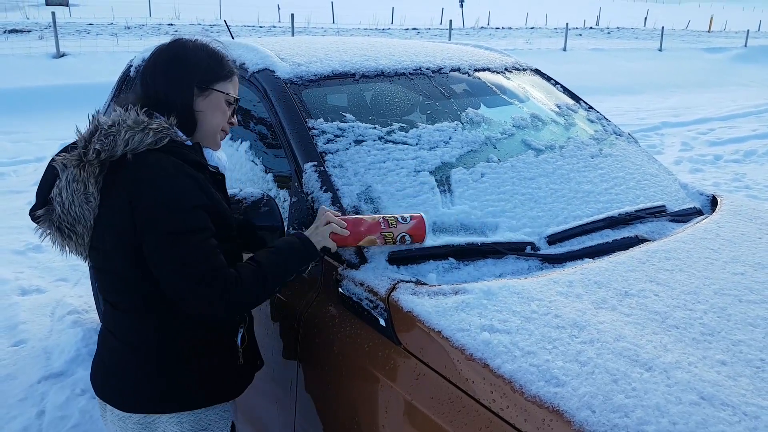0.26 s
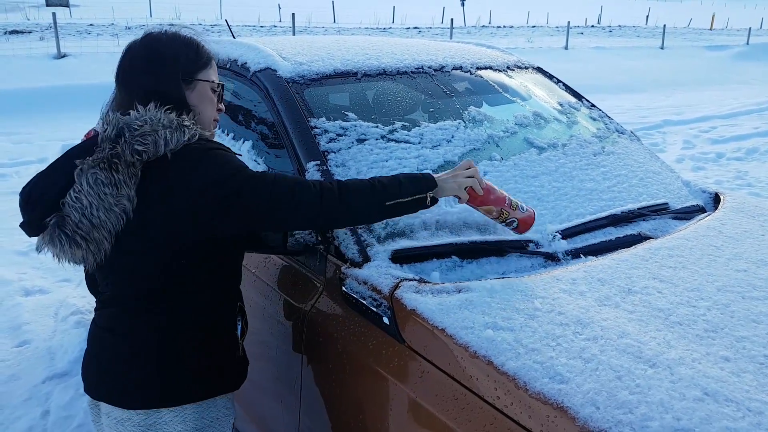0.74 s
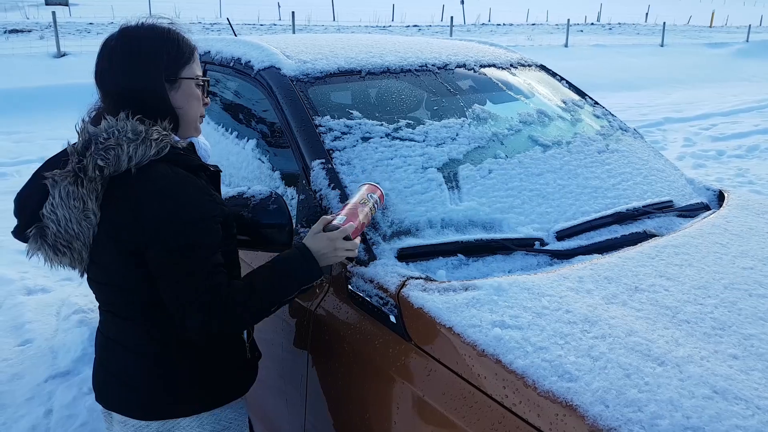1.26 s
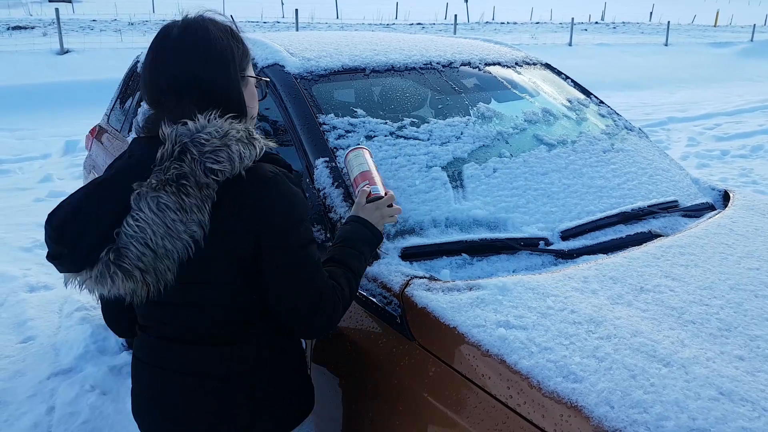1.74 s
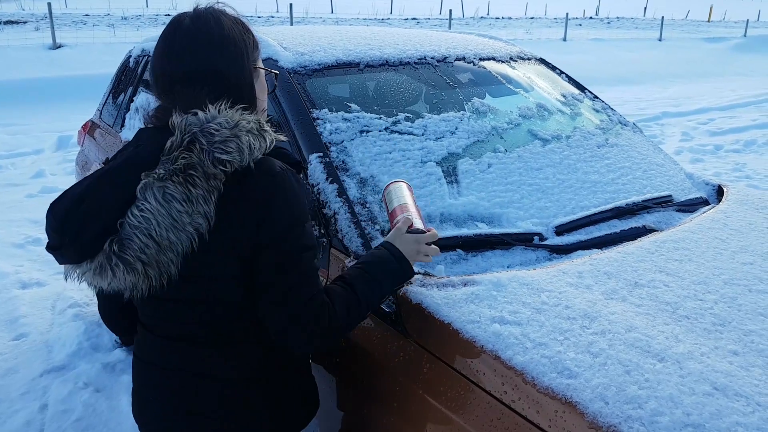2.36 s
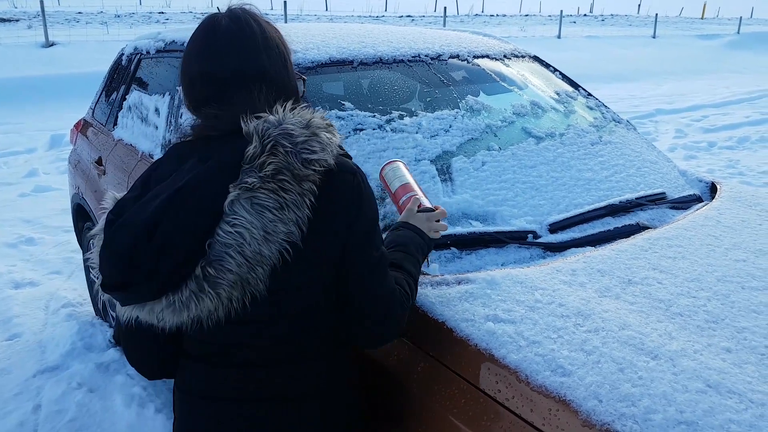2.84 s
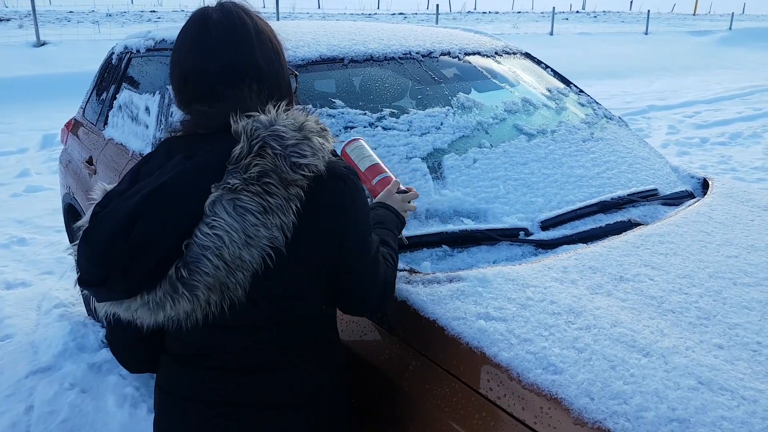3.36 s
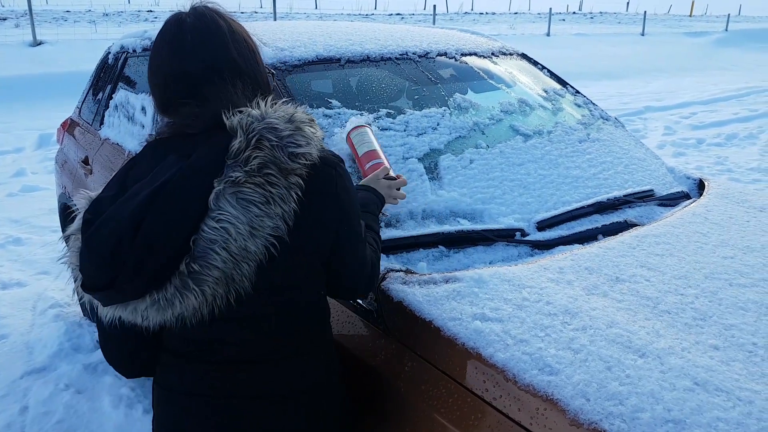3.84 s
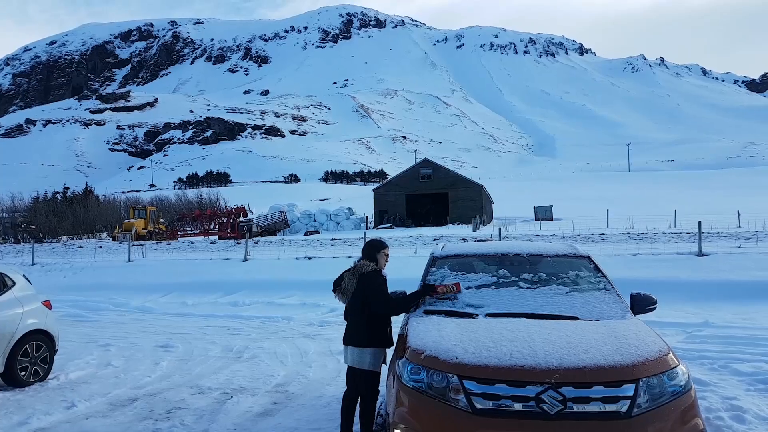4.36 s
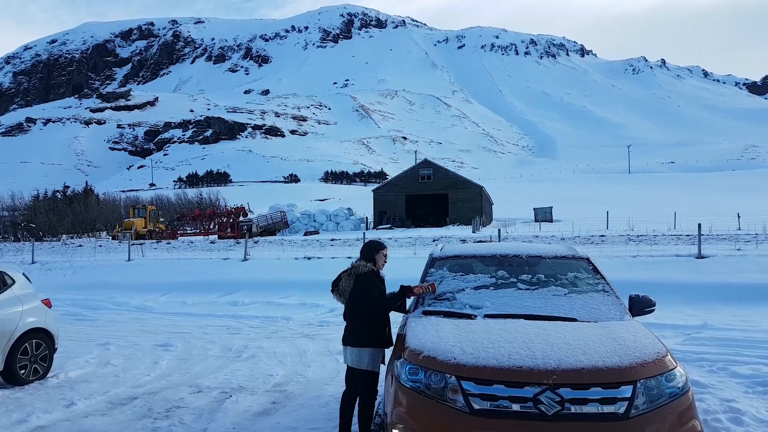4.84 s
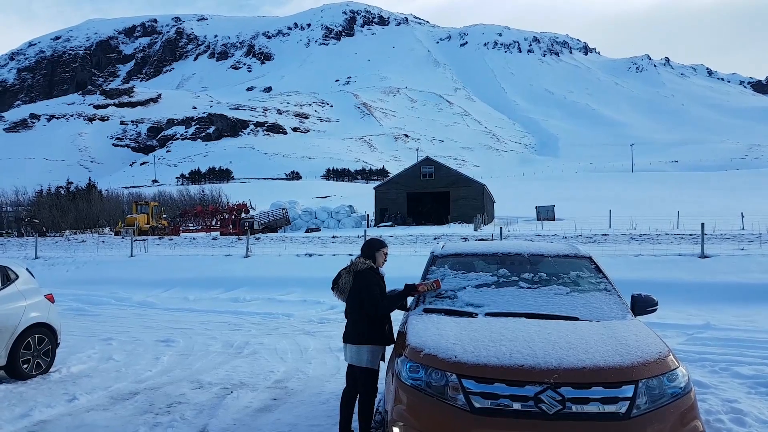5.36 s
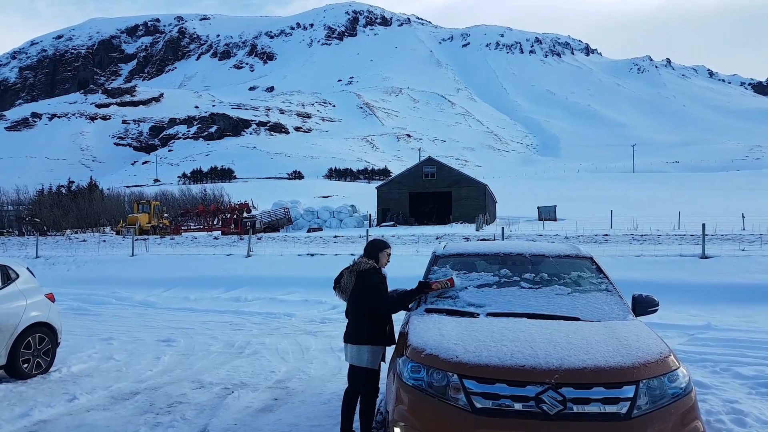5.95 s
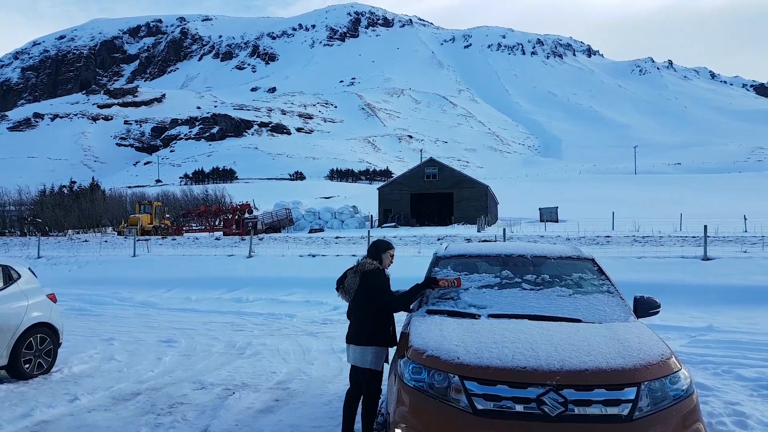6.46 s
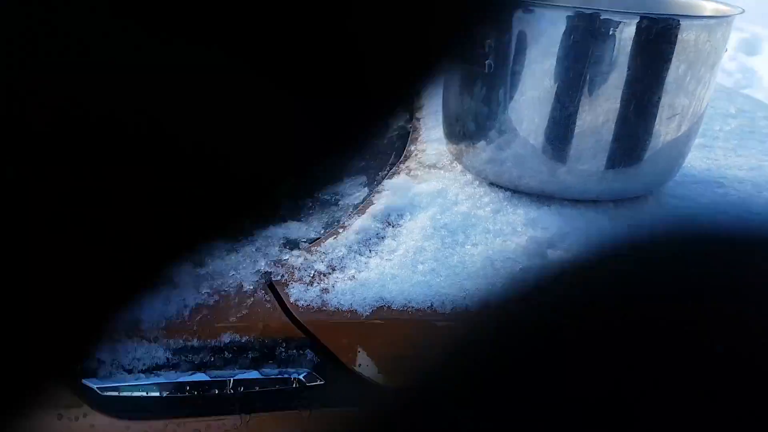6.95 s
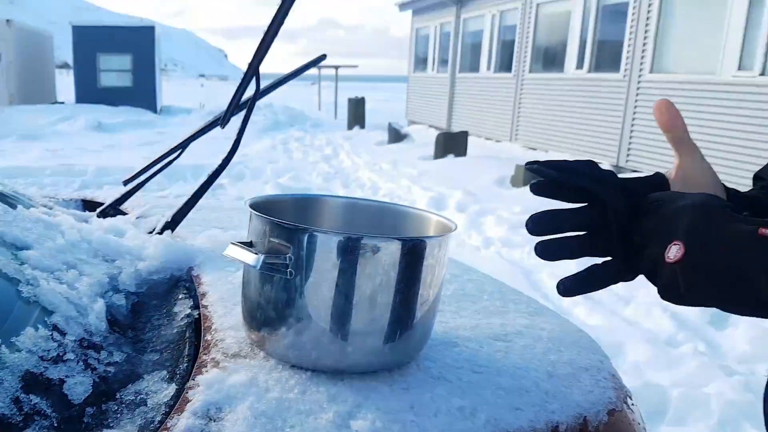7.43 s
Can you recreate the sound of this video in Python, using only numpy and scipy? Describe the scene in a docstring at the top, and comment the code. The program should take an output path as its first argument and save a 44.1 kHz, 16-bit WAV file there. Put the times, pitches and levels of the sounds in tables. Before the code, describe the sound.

Irregular crunchy scrapes of a tube rim on icy glass, dense at first, then in separated bursts, with faint jacket rustle and a soft engine idle. The scraping cuts to a weaker, more distant sound with loose icy crackles. Then it stops, and a much stronger low motor rumble appears at close range, with a brushing glove and blunt handling thumps on the microphone.

```python
"""Outdoors in snow, beside an idling car: a cardboard tube's rim scrapes frost off the windshield.
The rim catches, slips and crushes ice: first laid flat, then on edge, then heard from across the yard.
At last the microphone is beside the hood, where the engine rumbles and a glove brushes and bumps the camera.
Ice is random grains and blows ringing through resonances; the engine is firing tones over coloured noise;
jacket, wind and glove are shaped noise, and each bump is a swing of pressure with a dull knock."""
import sys
import numpy as np
from scipy import signal
from scipy.fft import rfft, irfft, next_fast_len
from scipy.io import wavfile
from scipy.ndimage import uniform_filter1d, map_coordinates

SR = 44100
rng = np.random.default_rng(int(sys.argv[2]) if len(sys.argv) > 2 else 0)


def unload_wav(signal):
    """Save mono or channel-first audio to the path in sys.argv[1] as 16-bit WAV at rate SR, clipped to [-1, 1]."""
    wavfile.write(
        sys.argv[1],
        SR,
        np.round(np.clip(np.atleast_2d(signal).T, -1, 1) * 32767).astype(np.int16),
    )


N = 339429  # length in samples

# Times in seconds: the tube turns on edge; the microphone is across the yard; it is beside the hood.
TURN_S, FAR_S, HOOD_S = 1.0, 4.09, 6.822

# The idle sinks as the engine warms. Each row: time in seconds, firings per second.
IDLE_RATE = [(0, 43.2), (4.08, 42.9), (4.1, 40.8), (5.3, 40.0), (6.81, 40.4), (6.83, 34.5), (7.7, 34.4)]
# Engine tones. Each row: multiple of the firing rate, then level in dB by the door, from afar, by the hood.
ENGINE_TONES = [(1, -53.5, -43, -34), (2, -90, -65, -70), (3, -51.5, -67, -40.5), (4, -52, -55.5, -39.5),
                (5, -49.5, -51.5, -35)]
# Colour of engine and open-air noise at each place. Each row: frequency in Hz, relative density in dB per Hz.
DOOR_NOISE = [(29, -37), (50, -9), (119, 0.5), (600, -7), (1070, -10.5), (1910, -13.5), (6550, -40),
              (16000, -98)]
YARD_NOISE = [(60, -20), (113, -0.5), (142, -8), (172, -17), (207, -4.5), (268, -17), (400, -21),
              (621, -14), (698, -23.5), (1700, -25), (2090, -33), (16000, -62.5)]
HOOD_NOISE = [(41, -52), (70, -2), (170, 0), (214, -2), (314, -21.5), (376, -13), (853, -20.5), (1650, -27),
              (4480, -47), (11600, -68)]
# Stereo width of the broad noises. Each row: frequency in Hz, side minus middle in dB.
AIR_WIDTH = [(100, -13), (350, -11), (1000, -4), (2500, -1)]

# Wind on the microphone ports. Each row: time in seconds, level in dB.
WIND_LEVEL = [(0, -27), (.25, -37), (.55, -63)]
# Colour of the wind. Each row: frequency in Hz, relative density in dB per Hz.
WIND_COLOUR = [(20, 6.5), (180, 8), (330, -14), (2000, -38.5)]
# Rustle of the jacket. Each row: time in seconds, level in dB.
JACKET_LEVEL = [(0, -64), (1.3, -56), (3.0, -51.5), (3.4, -56)]
# Colour of rubbing fabric. Each row: frequency in Hz, relative density in dB per Hz.
CLOTH_COLOUR = [(3500, 4), (7000, -5), (10500, 1), (16000, -1)]

# The rim lands or catches on a ridge of ice.
# Each row: time in seconds, relative level in dB, relative treble against body in dB.
CATCHES = [(0.121, -13, -8.5), (.248, -13, -20), (0.262, -16, -22), (0.362, -1.5, -23.5),
           (0.378, -7.5, -35), (.511, -7, -20), (.555, -7, -20), (0.622, -8, -13), (.639, -17.5, -2),
           (0.66, -13, -24), (1.415, -2.5, -29), (1.449, -14.5, -3.5), (1.616, -20, -3), (1.701, -11, -25),
           (1.72, -4.5, -16), (1.744, -15.5, -2.5), (1.965, -10.5, -19), (2.069, -9.5, -15),
           (2.116, -14.5, -8.5), (2.15, -6, -30), (2.404, -27, -28), (2.619, -10, -20), (2.641, -10, -19),
           (2.757, -7.5, -15.5), (3.075, -10, -13.5), (3.508, -9.5, -18.5), (3.531, -12, -14),
           (3.541, -12.5, -13.5), (3.577, -14, -9.5), (3.832, -17.5, -16), (3.911, -9.5, -17),
           (3.975, -5.5, -20), (4.043, -18, -34), (4.109, -21, -12.5), (4.158, -21.5, -9.5),
           (4.217, -20, -19), (4.319, -18.5, -12.5), (4.934, -20.5, -30), (5.682, -15.5, -16.5),
           (6.532, -28.5, -16), (6.58, -21.5, -19), (6.6, -27.5, -9.5), (6.625, -16.5, -19),
           (6.633, -19.5, -22)]
# Strokes of the rim over the frost. Each row: start, attack, hold and release in seconds,
# relative level in dB, extra treble in dB.
STROKES = [(0.243, 0.0037, 0.019, 0.0048, -14, 0.5), (0.375, 0.015, 0.3, 0.046, -15, -0.5),
           (0.577, 0.021, 0.16, 0.017, -17, 1), (0.778, 0.022, 0.0034, 0.0061, -20.5, -1.5),
           (0.812, 0.03, 0.014, 0.017, -29, -8), (1.429, 0.017, 0.059, 0.0077, -18, 3),
           (1.629, 0.0045, 0.024, 0.0079, -23.5, -20), (1.672, 0.014, 0.11, 0.016, -20.5, 4.5),
           (1.978, 0.053, 0.13, 0.011, -28.5, 12.5), (2.591, 0.017, 0.078, 0.055, -15, 3),
           (2.765, 0.0057, 0.0082, 0.035, -26.5, 3), (3.056, 0.015, 0.02, 0.11, -18.5, 1),
           (3.172, 0.038, 0.051, 0.048, -32.5, -11), (3.506, 0.0023, 0.026, 0.06, -17.5, -2.5),
           (3.579, 0.0035, 0.0085, 0.0054, -22.5, 8.5), (3.825, 0.099, 0.012, 0.074, -16.5, 2.5),
           (3.979, 0.0059, 0.015, .01, -26, 13), (4.127, 0.023, 0.046, 0.056, -32, 3.5),
           (4.237, 0.082, 0.037, 0.15, -27.5, -1), (4.419, 0.041, 0.15, 0.038, -32.5, -0.5),
           (5.016, 0.048, 0.091, 0.0086, -30.5, 0.5), (5.622, 0.065, 0.0088, 0.036, -31, 3),
           (5.711, 0.017, 0.01, 0.024, -24, 5), (5.981, 0.03, 0.049, 0.044, -27, 1),
           (6.106, 0.23, 0.025, .04, -44, 10), (6.309, 0.043, 0.022, 0.034, -24.5, 2.5),
           (6.391, 0.019, 0.0091, 0.051, -31.5, 5.5), (6.557, 0.081, 0.15, 0.013, -45, 9.5)]
SAG_DB = 3  # the push eases by this much over the hold
# The frost is patchy, more so in the later, distant strokes: unevenness in dB, random knots per second.
UNEVEN_DB, UNEVEN_LATE_DB, UNEVEN_PER_S = 2, 2.5, 76
# Resonances of tube and glass. Each row: frequency in Hz, width in Hz,
# then lift in dB laid flat, on edge, from afar.
TUBE_MODES = [(517, 49, 13, 5, 15), (597.5, 70, 9.5, 8, 8), (880, 145, 13.5, 11, 11.5),
              (1700, 190, 4, 2.5, -1.5), (1914, 310, 0.5, 6.5, 11), (2100, 104, -2, -1.5, 9.5),
              (2730, 75, 7, 0.5, 4.5), (3820, 240, 9.5, 1.5, -2.5)]
# Colour of the breaking frost for each grip and distance. Each row: frequency in Hz, relative level in dB.
FLAT_COLOUR = [(100, -19.5), (250, -11), (430, -14), (700, -5), (1120, -6.5), (1500, 2.5), (2000, -3),
               (3000, -15), (4200, -12.5), (5800, -14), (6800, -28), (8800, -23.5), (16000, -36)]
ON_EDGE_COLOUR = [(100, -26), (250, -8), (700, -4), (1120, -3), (1500, 5), (2000, -3), (3000, -15),
                  (4200, -9.5), (5800, -13.5), (6800, -29.5), (8800, -24), (16000, -30.5)]
AFAR_COLOUR = [(100, -26), (250, -10), (700, -2), (1120, -3.5), (1500, 4), (2000, -19), (3000, -11.5),
               (4200, -7.5), (5800, -18.5), (6800, -29.5), (8800, -22.5), (16000, -32.5)]
# The ring changes with the spot under the rim.
# Each row: start in seconds, end in seconds, frequency in Hz, width in Hz, lift in dB.
SPOTS = [(.37, 0.562, 2160, 220, 8.5), (0.603, 0.774, 500, 90, 5.5), (0.663, 0.775, 3520, 990, 8.5),
         (1.45, 1.515, 880, 90, 7), (2.595, 2.706, 1820, 220, 2), (3.07, 3.158, 790, 450, 7),
         (3.5, 3.545, 4900, 900, 10.5), (3.86, 4.01, 5630, 600, 6), (5.685, 5.79, 2750, 70, 5),
         (6.58, 6.8, 4360, 200, 6.5)]
# Stereo width of the scrape. Each row: frequency in Hz, side minus middle in dB.
SCRAPE_WIDTH = [(700, -21), (1600, -18), (2400, -9), (4400, -7), (8000, 0)]
# Left-right tilt of the scrape. Each row: frequency in Hz, left minus right in dB.
SCRAPE_TILT = [(2400, -.3), (4400, 2.5)]

# A glove brushes over the camera.
# Each row: time in seconds, peak level in dB, half length in seconds, left minus right in dB.
BRUSHES = [(6.828, -37.5, 0.017, -12), (6.968, -44, 0.036, 27), (6.94, -43, 0.14, 10.5),
           (7.22, -50.5, 0.067, 8), (7.64, -50.5, 0.26, 2)]
# Fingers press on the right port.
# Each row: time in seconds, peak of the swing in dB, half length in seconds, knock against swing in dB.
BUMPS = [(6.840, -8, .0021, -19), (7.315, -18, .0009, -13), (7.419, -13.5, .0004, -13),
         (7.594, -8, .0011, -27)]
TOP_HZ = 16050  # the camera keeps nothing above this


def amp(db):
    """Decibels to gain."""
    return 10 ** (np.asarray(db) / 20)


def unit(x):
    """Scale to rms 1."""
    return x / np.sqrt(np.mean(x ** 2) + 1e-20)


def along(points, hz):
    """Read (Hz, value) points on a log frequency axis."""
    point_hz, values = np.transpose(points)
    return np.interp(np.log(hz + 1), np.log(point_hz + 1), values)


def curve(rows):
    """(seconds, value) rows as one value per sample."""
    return np.interp(np.arange(N) / SR, *np.transpose(rows))


def between(start, end):
    """1 between two times, else 0, with soft edges."""
    t = np.arange(N) / SR
    inside = ((t >= start) & (t < end)) * 1.
    return uniform_filter1d(inside, size=128)


def wobble(rate):
    """A smooth random curve, rate knots a second."""
    knots = rng.standard_normal(int(N * rate / SR) + 4)
    return map_coordinates(knots, [np.arange(N) * rate / SR])


def smooth(x, seconds):
    """Two running means, for a soft rise and fall."""
    size = round(seconds * SR)
    return np.abs(uniform_filter1d(uniform_filter1d(x, size), size))


def lowpass(x, hz, order=1):
    """Keep what lies below a corner frequency."""
    return signal.lfilter(*signal.butter(order, hz, fs=SR), x)


def coloured(x, level):
    """Causal (minimum-phase) filter whose gain in dB is level(Hz)."""
    m = 2 * next_fast_len(N // 2 + SR // 4)
    gain = amp(level(np.fft.rfftfreq(m, 1 / SR)))
    # folding the cepstrum onto positive times makes the filter causal
    cepstrum = irfft(np.log(gain), m)
    cepstrum[1:m // 2] *= 2
    cepstrum[m // 2 + 1:] = 0
    response = np.exp(rfft(cepstrum))
    return irfft(rfft(x, m) * response, m)[..., :N]


def spread(pair, side_points):
    """Two signals as the middle and the side of a stereo sound."""
    side = coloured(pair[1], lambda hz: along(side_points, hz))
    return np.array([pair[0] + side, pair[0] - side])


def pan(db):
    """Gains of left and right for a level difference, left minus right."""
    return amp(np.array([[db], [-db]]) / 2)


def rush(spectrum):
    """Stereo noise of rms 1 with a given colour."""
    noise = coloured(rng.standard_normal((2, N)), lambda hz: along(spectrum, hz))
    return unit(spread(noise, AIR_WIDTH))


def engine(fan_hz, fan_db):
    """Multiples of an unsteady firing rate over mechanical noise, at three places; a fan hums by the hood."""
    t = np.arange(N) / SR
    by_door = between(0, FAR_S)
    in_yard = between(FAR_S, HOOD_S - .008)
    by_hood = between(HOOD_S, N / SR + 1)
    places = np.array([by_door, in_yard, by_hood])
    firing_hz = curve(IDLE_RATE) * (1 + 0.0044 * wobble(12.0))
    phase = 2 * np.pi * np.cumsum(firing_hz) / SR
    tones = np.zeros(N)
    for multiple, *levels in ENGINE_TONES:
        strength = amp(levels) @ places * amp(0.15 * wobble(1.52))
        tones += strength * np.sin(multiple * phase + 2 * np.pi * rng.random())
    fan = amp(fan_db) * by_hood * np.sin(2 * np.pi * fan_hz * t)
    door = amp(-41.0) * pan(-1.4) * rush(DOOR_NOISE)
    yard = amp(-43) * pan(0.17) * rush(YARD_NOISE)
    hood = amp(-30.0) * pan(-3.0) * rush(HOOD_NOISE)
    noise = (door * by_door + yard * in_yard + hood * by_hood) * amp(0.57 * wobble(3.32))
    return pan(-0.59) * (tones + fan) + noise


def wind():
    """A puff of wind buffets each port on its own: unrelated low noise left and right."""
    buffet = unit(coloured(rng.standard_normal((2, N)), lambda hz: along(WIND_COLOUR, hz)))
    return amp(curve(WIND_LEVEL) + 2 * wobble(22)) * buffet


def jacket():
    """Rubbing fabric: treble noise that sways slowly and flutters, until the microphone is in the yard."""
    sway = amp(1.8 * wobble(5) + .7 * wobble(60))
    return amp(curve(JACKET_LEVEL)) * sway * between(0, FAR_S) * pan(5.1) * rush(CLOTH_COLOUR)


def catches(crumble_s, crumble, hard_db, hard_hz):
    """Each catch is one sharp blow and a few ms of crumbling ice; harder ice gives more treble."""
    force = np.zeros((2, N))
    t = np.arange(SR // 50) / SR
    for s, db, treble_db in CATCHES:
        blow = crumble * rng.standard_normal((2, len(t))) * np.exp(-t / crumble_s)
        blow[:, 0] += 1  # the sharp blow itself
        blow *= amp(db) / np.linalg.norm(blow[0])
        dull = lowpass(blow, hard_hz)
        bright = amp(treble_db + hard_db) * (blow - dull)
        force[:, round(s * SR):][:, :len(t)] += dull + bright
    return force


def strokes():
    """Each stroke swells, holds while the push eases, and dies away: contact strength, and its treble."""
    t = np.arange(N) / SR
    power, treble_power = np.zeros((2, N))
    for start, attack, hold, release, db, treble_db in STROKES:
        end = start + attack + hold + 3 * release
        span = slice(round(start * SR), round(end * SR))
        age = t[span] - start
        swell = np.clip(age / attack, 0, 1) ** 1.39
        eased = np.clip((age - attack) / hold, 0, 1)
        lifted = np.maximum(age - attack - hold, 0) / release
        push = swell * amp(db - SAG_DB * eased - 20 * lifted)
        power[span] += push ** 2
        treble_power[span] += (push * amp(treble_db)) ** 2
    uneven_db = np.where(t < FAR_S, UNEVEN_DB, UNEVEN_LATE_DB)
    patches = amp(uneven_db * wobble(UNEVEN_PER_S))
    return patches * np.sqrt(power), patches * np.sqrt(treble_power)


def fractures(slip_rate, slip_s, slip_scatter_db, drag, grain_rate, grain_scatter_db):
    """Force of the sliding rim, steady on average: uneven slips, each a burst of snapping ice grains."""
    def random_hits(per_s, scatter_db):
        # sizes are capped, so that no slip outdoes the catches
        size = np.minimum(rng.standard_normal(N), 1.5)
        return (rng.random(N) < per_s / SR) * amp(scatter_db * size)

    slips = random_hits(slip_rate, slip_scatter_db)
    decaying = signal.lfilter([1], [1, -np.exp(-1 / (slip_s * SR))], slips)
    bursts = drag + unit(decaying)
    grains = random_hits(grain_rate, grain_scatter_db)
    force = bursts * grains * rng.choice([-1, 1], (2, N))
    # level the power over 600 samples, so that loudness follows the strokes
    power = np.abs(uniform_filter1d(force[0] ** 2, size=600))
    return force / np.sqrt(power + 1e-9)


def shifting(force, depth_db):
    """As the rim travels, each patch of frost favours other pitches for a few hundredths of a second."""
    z = signal.stft(force, nperseg=512)[2]
    field = rng.standard_normal(z.shape[1:])
    field = uniform_filter1d(field, size=4, axis=0)  # across pitch
    field = uniform_filter1d(field, size=5, axis=1)  # across time
    shifted = signal.istft(z * amp(depth_db * unit(field)), nperseg=512)[1]
    return unit(shifted[:, :N])


def crumbs(strength, linger_s, grain_rate, scatter_db):
    """Around each stroke the tube nudges loose snow, which crackles in single grains."""
    size = np.clip(rng.standard_normal(N), -2, 2)
    grains = (rng.random(N) < grain_rate / SR) * amp(scatter_db * size)
    return unit(grains * rng.choice([-1, 1], (2, N))) * smooth(strength, linger_s)


def tube(force, spectrum, column):
    """Tube and glass ring under the force: resonant peaks on the frost's colour, at mean power gain 1."""
    def level(hz):
        db = along(spectrum, hz)
        for mode in TUBE_MODES:
            mode_hz, width_hz = mode[:2]
            db = db + mode[column] / (1 + (2 * (hz - mode_hz) / width_hz) ** 2)
        return db - 10 * np.log10(np.mean(amp(db) ** 2))
    return coloured(force, level)


def spots(x):
    """Each spot of the glass that the rim crosses lifts one resonance."""
    lift = np.zeros_like(x)
    for start, end, hz, width_hz, db in SPOTS:
        span = slice(round(start * SR), round(end * SR))
        fade = signal.windows.tukey(span.stop - span.start, .1)
        band = signal.lfilter(*signal.iirpeak(hz, hz / width_hz, fs=SR), x[:, span])
        lift[:, span] += (amp(db) - 1) * fade * band
    return x + lift


def car_body(x, wet_db, t60):
    """Glass and panels ring briefly, in a mix of two decaying noise tails that turns as the rim travels."""
    t = np.arange(SR // 5) / SR
    turn = 2 * np.pi * wobble(2)
    answer = np.zeros((2, N))
    for share in (np.cos(turn), np.sin(turn)):
        tail = rng.standard_normal((2, len(t))) * amp(-60 * t / t60) * (t > .002)
        tail /= np.linalg.norm(tail[0])
        answer += signal.fftconvolve(x * share, tail, axes=1)[:, :N]
    return x + amp(wet_db) * answer


def scraping(catch_db, slide_db, split_hz, near_crumb_db, far_crumb_db):
    """Strokes, catches and crumbs drive the tube, which sounds different for each grip and distance."""
    blows = amp(catch_db) * catches(crumble_s=0.0032, crumble=0.74, hard_db=17, hard_hz=2530)
    strength, treble = strokes()
    grit = fractures(slip_rate=280, slip_s=0.0067, slip_scatter_db=4.0,
                     drag=0.085, grain_rate=5500, grain_scatter_db=2.5)
    ice = amp(slide_db) * shifting(grit, depth_db=3.5)
    body = lowpass(ice * strength, split_hz)
    edge = ice * treble - lowpass(ice * treble, split_hz)
    force = blows + body + edge
    loose = crumbs(strength, linger_s=0.35, grain_rate=310, scatter_db=5.5)
    near = force + amp(near_crumb_db) * loose
    far = force + amp(far_crumb_db) * loose
    # the last argument is the column of lifts in TUBE_MODES
    flat = tube(near * between(0, TURN_S), FLAT_COLOUR, 2)
    on_edge = tube(near * between(TURN_S, FAR_S), ON_EDGE_COLOUR, 3)
    afar = tube(far * between(FAR_S, HOOD_S), AFAR_COLOUR, 4)
    by_car = spread(car_body(spots(flat + on_edge), wet_db=-14.5, t60=0.099), SCRAPE_WIDTH)
    in_yard = spread(car_body(spots(afar), wet_db=-7, t60=0.025), SCRAPE_WIDTH)
    # near the car the sound reaches the left port first, by one sample
    left, right = by_car
    ports = np.array([left, np.roll(right, 1)]) + pan(2.9) * in_yard
    return np.array([coloured(port, lambda hz: sign * along(SCRAPE_TILT, hz) / 2)
                     for port, sign in zip(ports, (1, -1))])


def glove():
    """A glove brushes the camera: fluttering fabric noise under one bell-shaped contact per brush."""
    t = np.arange(N) / SR
    contact = np.zeros((2, N))
    for s, db, half, pan_db in BRUSHES:
        contact += amp(db) * pan(pan_db) * np.exp(-((t - s) / half) ** 2)
    return contact * between(HOOD_S, N / SR + 1) * amp(2.0 * wobble(300)) * rush(CLOTH_COLOUR)


def bumps(left_port_db, knock_hz):
    """A finger on the right port: one swing of pressure down and up, with a dull knock; faint on the left."""
    t = np.arange(N) / SR
    knock = unit(lowpass(rng.standard_normal(N), knock_hz, order=4))
    pressure = np.zeros(N)
    for s, db, half, knock_db in BUMPS:
        u = (t - s) / half
        pressure += amp(db) * (u + amp(knock_db) * knock) * np.exp((1 - u ** 2) / 2)
    return pressure * amp([[left_port_db], [0]])


def scene():
    """The idling car and the wind, the scraping, and the hands on the camera."""
    car = engine(fan_hz=62.1, fan_db=-35.5)
    scrape = scraping(catch_db=14, slide_db=-3.0, split_hz=1650, near_crumb_db=-26, far_crumb_db=-12.0)
    handling = jacket() + glove() + bumps(left_port_db=-36, knock_hz=1560)
    return car + wind() + scrape + handling


def record(dry):
    """Add the camera's faint hiss, keep the loudest blows within range, cut all above the band limit."""
    x = dry + amp(-74.0) * rng.standard_normal((2, N))
    x = x / (1 + np.abs(x / .8) ** 4) ** (1 / 4)  # a soft ceiling
    m = next_fast_len(N + SR // 4)
    kept = np.fft.rfftfreq(m, 1 / SR) < TOP_HZ
    return irfft(rfft(x, m) * kept, m)[:, :N]


dry = scene()
out = record(dry)
unload_wav(out)
```